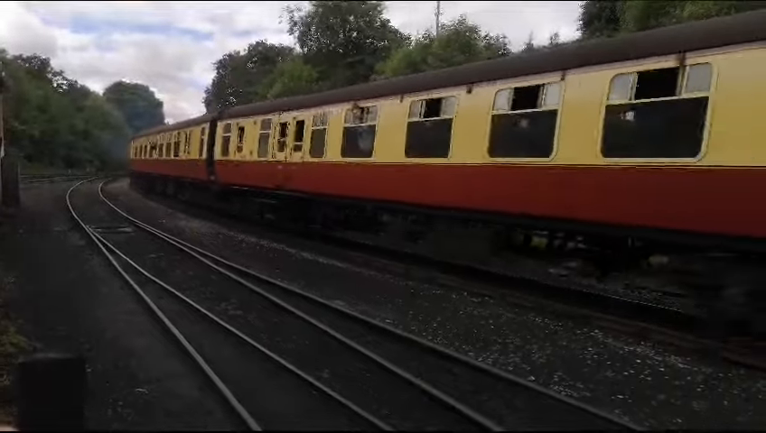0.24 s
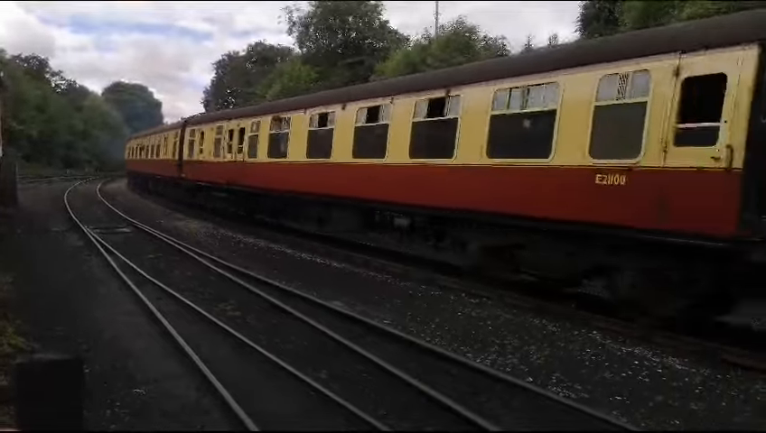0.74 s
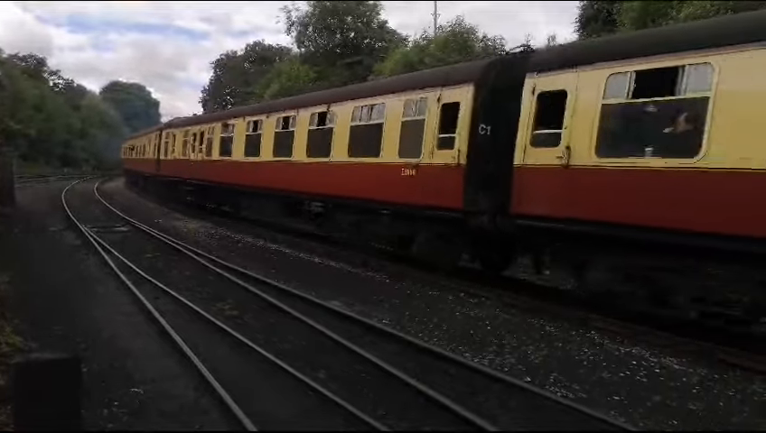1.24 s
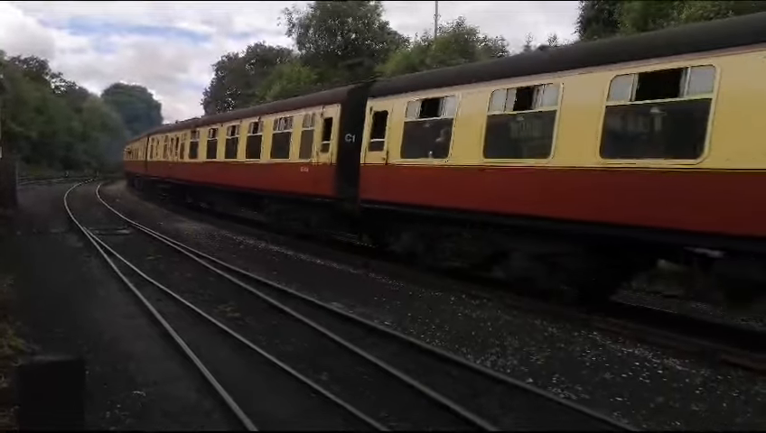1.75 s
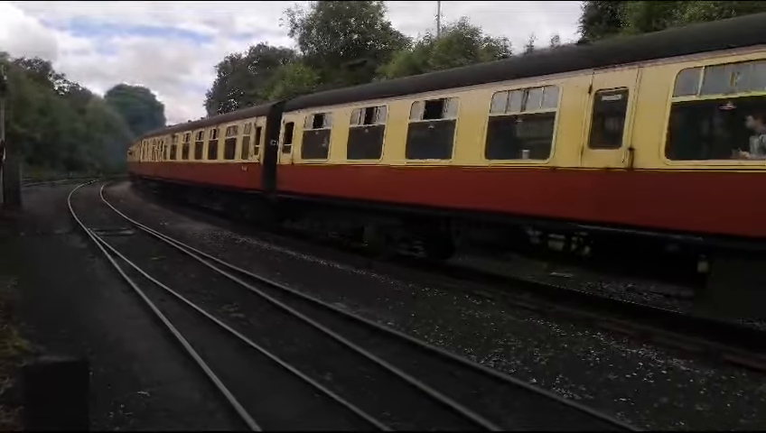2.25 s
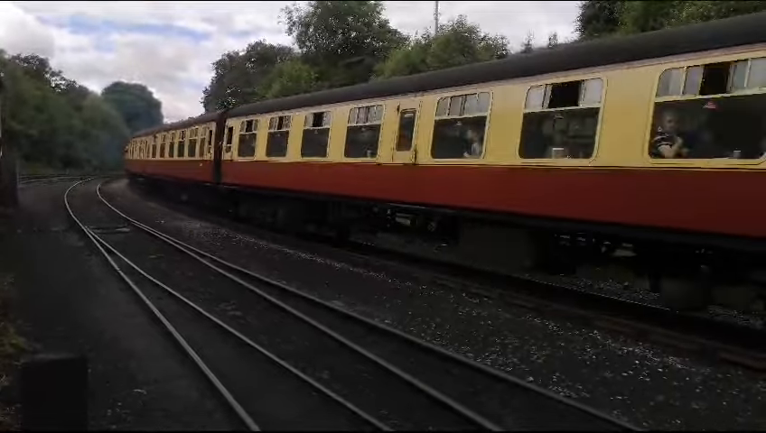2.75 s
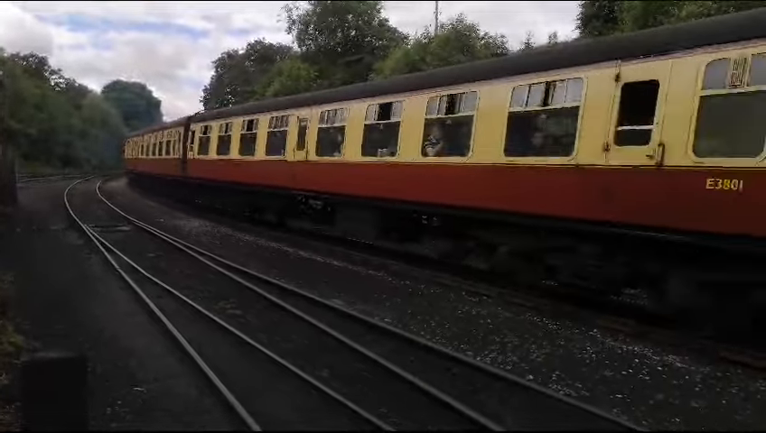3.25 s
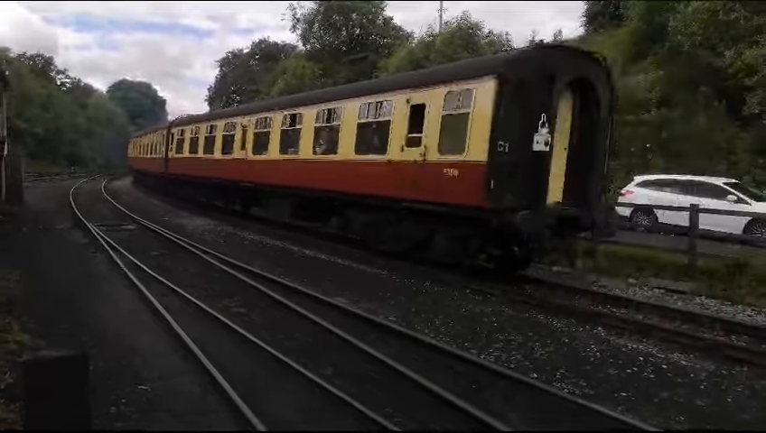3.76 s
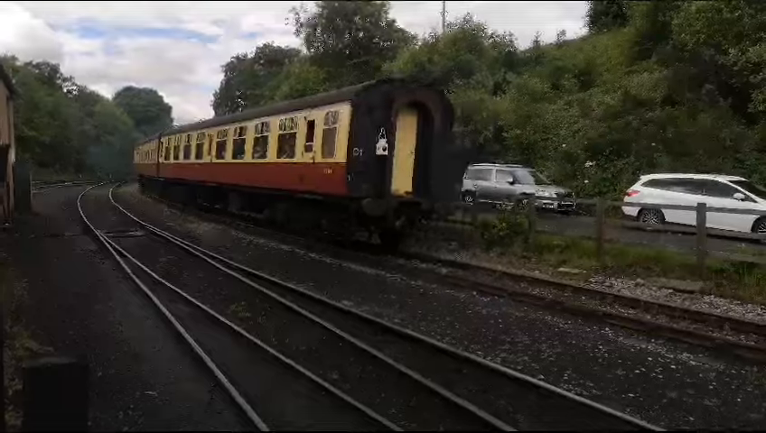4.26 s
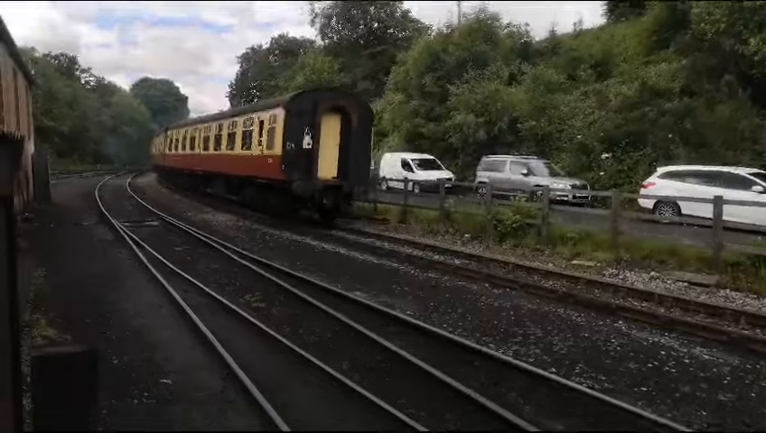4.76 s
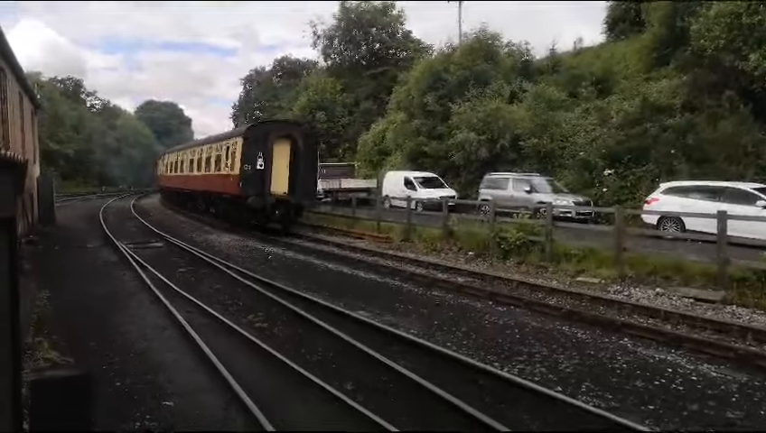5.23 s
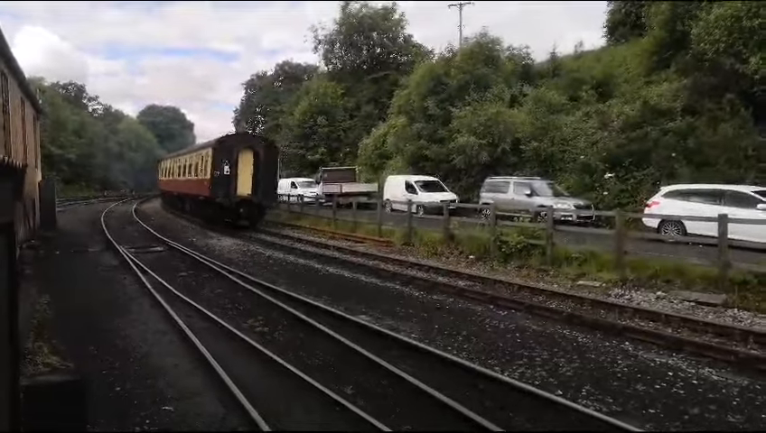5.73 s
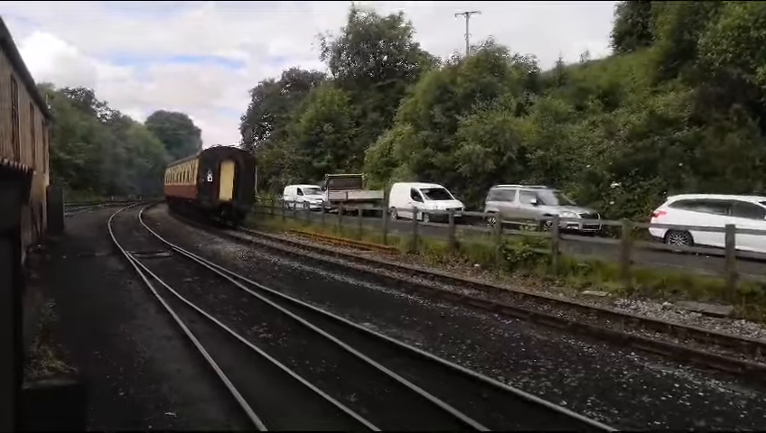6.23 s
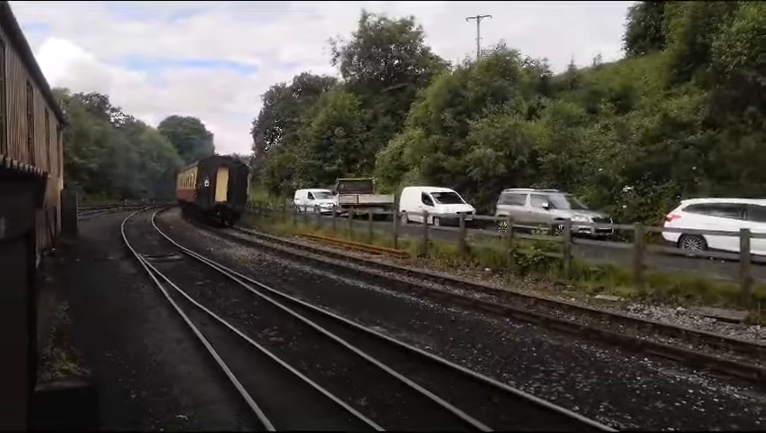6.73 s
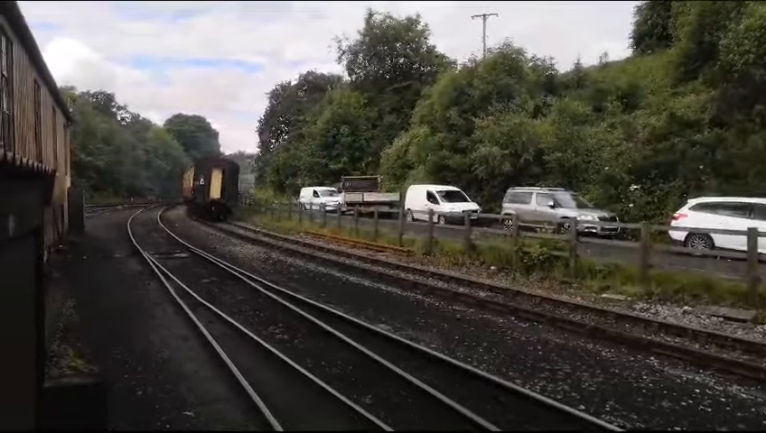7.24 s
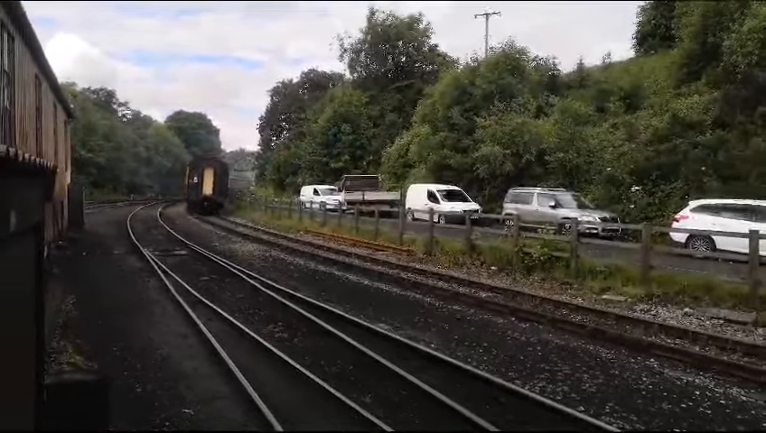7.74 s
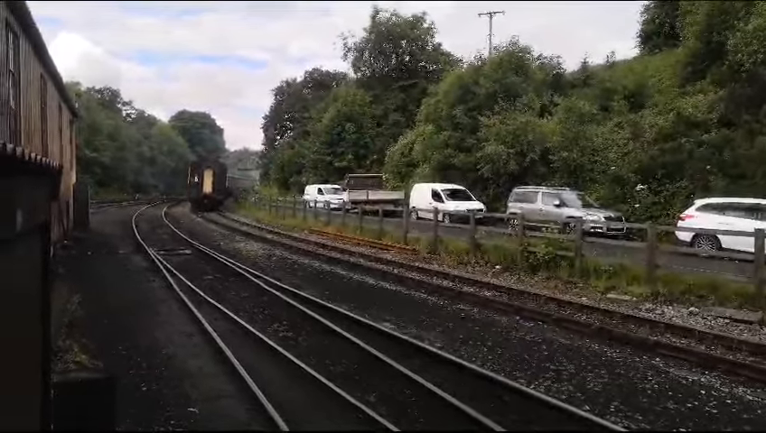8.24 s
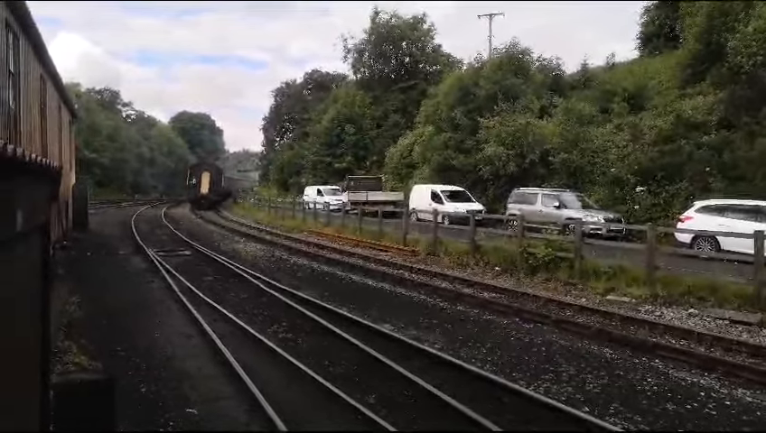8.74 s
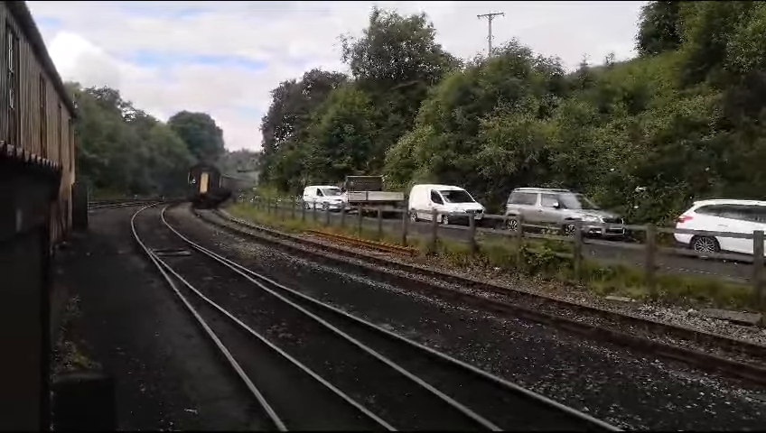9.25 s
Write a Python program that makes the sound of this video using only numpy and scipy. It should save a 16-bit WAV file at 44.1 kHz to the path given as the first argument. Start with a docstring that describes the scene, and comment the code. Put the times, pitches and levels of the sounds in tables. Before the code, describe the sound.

Close by, railway coaches roll past with a deep rumble, rough roar and singing wheels, knocking in clanking clusters over rail joints. After the last coach passes, the rolling fades around a bend. A nearby diesel keeps a low throbbing drone, with fine rattling and small ringing knocks emerging. Outdoor stereo, brighter and fuller on the left, dull on the right.

```python
"""Coaches receding over jointed rails, with a diesel engine

Wheels roar, sing and knock at the rail joints, then the rolling sound falls by an inverse-distance law.
A diesel nearby is made of summed tones, throbbing clatter, a soft murmur, ringing knocks and fine rattling.
Ground rumble lies beneath; ticks and puffs of hiss are heard at the microphone.
The right port is shadowed: filtered duller, with a phase lag on its direct part and a wandering scattered part.
"""
import sys
import numpy as np
from scipy import signal
from scipy.fft import rfft, irfft, next_fast_len
from scipy.io import wavfile

SR = 44100
rng = np.random.default_rng(int(sys.argv[2]) if len(sys.argv) > 2 else 0)


def waveform_to_disk(signal):
    """Save audio, clipped to [-1, 1], as 16-bit WAV at the path in sys.argv[1]."""
    frames = np.transpose(np.atleast_2d(signal))
    scaled = np.clip(frames, -1, 1) * 32767
    samples = np.round(scaled).astype(np.int16)
    wavfile.write(sys.argv[1], SR, samples)


N = 418509
PADDED = next_fast_len(N)
TIME = np.arange(N) / SR  # s
AGE = np.arange(SR // 4) / SR  # s since the onset of a short sound

# Ground rumble spectrum. Each row: frequency in Hz, relative density in dB per Hz.
GROUND_SPECTRUM = [(6, -10), (15, -9.5), (30, -7), (50, -3.5), (75, -8), (100, -12), (160, -24.5)]
# Ground rumble level. Each row: time in seconds, level in dB before its slow surges.
GROUND_LEVEL = [(0, -24.5), (.8, -28), (2.2, -33.5), (3.2, -32.5), (4.6, -31.5), (5.5, -31), (7, -29),
                (8, -31.5), (9.49, -33)]
# Soft murmur of the engine, swelling toward the end. Each row: time in seconds, level in dB.
MURMUR_LEVEL = [(5, -67), (6.5, -60), (7.6, -60), (8.3, -56), (9.49, -44)]
# Louder ringing knocks of the engine. Each row: start in seconds, level in dB before the envelope, pitch in Hz.
ENGINE_KNOCKS = [(7.1608, -21, 1760), (7.3, -20, 1910), (7.4467, -18, 1860), (7.662, -19, 2650),
                 (7.7939, -25, 1920), (7.862, -17, 1830), (7.9076, -18.5, 1810), (8.1719, -19, 1620),
                 (8.6138, -21, 1830)]
# Fine rattling, in spurts from about 5 s on. Each row: time in seconds, level in dB.
RATTLE_LEVEL = [(4.8, -60), (5.05, -47), (5.4, -56), (6.1, -52), (6.3, -43), (6.48, -48), (6.65, -38),
                (6.85, -49), (7.1, -46), (7.8, -36), (8.4, -41), (8.8, -45), (9.49, -47.5)]
# Ticks of the casing. Each row: start in seconds, then the level in dB of each ring in TICK_RINGS.
TICKS = [(4.5092, -13, -26, -31, -36), (4.602, -20, -15, -15, -24), (5.305, -50, -45, -35, -35)]
# Damped rings within a tick. Each row: frequency in Hz, width in Hz.
TICK_RINGS = [(1900, 600), (3000, 900), (5500, 1500), (9500, 4000)]
# Puffs of hiss. Each row: centre in seconds, level in dB, 1/e half-length in seconds.
PUFFS = [(8.33, -50, 0.03), (9.41, -47.5, 0.035)]
# Puff spectrum. Each row: frequency in Hz, relative density in dB per Hz.
PUFF_SPECTRUM = [(2500, -3), (4500, 3), (8000, 0), (9800, -20), (15000, -20)]
# Engine cycle rate. Each row: time in seconds, rate in Hz before a slight wavering.
CYCLE_RATE = [(0, 21.28), (6.9, 21.33), (7.7, 20.56), (9.49, 20.82)]
# Engine tones, of the exhaust and a geared auxiliary. Each row: multiple of the cycle rate, relative level in dB.
ENGINE_TONES = [(1, -5.5), (2, 3), (3, 0.5), (4, -6), (5, -28.5), (6, -0.5), (6.3, -7.5), (7, -9),
                (7.5, -9), (9.2, -19), (13.3, -20), (19, -22.5), (20.3, -19)]
# Engine clatter spectrum. Each row: frequency in Hz, relative density in dB per Hz.
CLATTER_SPECTRUM = [(250, -4), (500, 4.5), (800, -7.5), (1200, -13), (1800, -5), (2650, -4), (3300, -17),
                    (4200, -19), (5000, -41), (5800, -27.5), (6500, -30), (7400, -26), (8200, -32.5),
                    (8900, -23), (9900, -39.5)]
# Engine clatter level. Each row: time in seconds, level in dB.
CLATTER_LEVEL = [(0, -30), (2.8, -30), (3.8, -30.5), (4.6, -33.5), (5.7, -34.5), (6.3, -37), (7.2, -36),
                 (8.2, -37), (9.49, -38.5)]
# Rolling rumble spectrum. Each row: frequency in Hz, relative density in dB per Hz.
RUMBLE_SPECTRUM = [(60, -14.5), (110, -3.5), (140, -2.5), (190, -0.5), (270, -3.5), (310, -7), (350, -11),
                   (450, -20), (600, -25.5)]
# Track roar spectrum. Each row: frequency in Hz, relative density in dB per Hz.
ROAR_SPECTRUM = [(300, -4), (500, 3.5), (800, 2), (1100, -1), (1700, 0), (2600, -4.5), (3300, -43.5),
                 (4500, -18.5), (6000, -26.5), (9000, -24.5)]
# Coach body boom. Each row: time in seconds, pitch in Hz, level in dB before distance loss.
BOOM = [(0, 160, -33), (.7, 175, -31.5), (1.1, 190.3, -30.5), (1.9, 187, -27.5), (2.3, 205, -30.5),
        (2.6, 240, -32.5), (2.97, 264.5, -27.5), (3.25, 215, -52), (3.55, 190, -26), (4.1, 198.4, -24.5),
        (4.45, 190, -28.5), (4.75, 170, -19.5), (5.0, 200, -26), (5.6, 190, -28), (6.3, 190, -35),
        (9.49, 165, -27)]
# Whine of the nearest wheel. Each row: time in seconds, pitch in Hz, level in dB before distance loss.
WHINE = [(0, 1804, -38), (.55, 1830, -38.5), (1.0, 1796, -40), (1.3, 1718, -40), (1.6, 1760, -39),
         (1.9, 1867, -41), (2.6, 1836, -38), (3.1, 1798, -39.5), (3.45, 1740, -37), (3.8, 1775, -39),
         (4.6, 1800, -38), (5.2, 1790, -49), (9.49, 1750, -56)]
# Wheel and rail modes. Each row: frequency in Hz, width in Hz of the first resonance, relative level in dB.
WHEEL_MODES = [(557, 165, -3.5), (951, 19, -6), (1335, 45, 0), (1260, 90, -9.5), (1705, 60, -2.5),
               (1788, 44, -3), (1860, 38, 0.5), (2028, 76, -0.5), (2537, 52, -2.5), (3145, 90, -20.5),
               (3880, 90, -19.5), (5830, 120, -28.5)]
# Strength of singing. Each row: time in seconds, relative drive of low, middle and high modes in dB.
SINGING = [(0, 1, -2.5, -8), (.6, 3.5, 4, 0.5), (1.3, -1.5, 1.5, 0.5), (2.0, -2.5, 3, -2),
           (2.4, -6.5, 3, 5.5), (2.9, 0, 0, -5.5), (3.5, 4.5, 5.5, -8.5), (3.7, 7, 0, 7), (3.9, 4.5, -1, 6),
           (4.3, -3.5, 5, 4), (4.8, -20, -1.5, -6.5), (5.5, -12, -6, 2), (9.49, 7.5, 9.5, -3.5)]
# The two frequencies in Hz that part the low, middle and high modes.
SINGING_SPLIT = [1500, 1950]
# Blows on rail joints. Each row: start in seconds, drive in dB, clear ring pitch in Hz,
# clear ring level in dB, thump level in dB, length scale in seconds.
BLOWS = [(0.282, -25, 1797, -28, -22.5, 0.042), (0.712, -15.5, 1730, -29, -14, 0.01),
         (0.73, -21, 1317, -35, -18, 0.023), (1.063, -18.5, 1680, -23, -15.5, 0.013),
         (1.07, -24.5, 1320, -28, -14, 0.032), (1.1537, -40, 1810, -36, -10.5, 0.015),
         (1.4944, -19.5, 1790, -21, -19, 0.022), (1.516, -16.5, 1747, -13.5, -14.5, 0.018),
         (1.545, -23.5, 1267, -24.5, -33, 0.044), (1.825, -25, 1890, -24, -26, 0.014),
         (1.8412, -20, 1870, -21, -15, 0.013), (1.861, -19.5, 1335, -17, -23, 0.017),
         (1.868, -28, 1890, -18, -39, 0.018), (2.774, -26, 1770, -24, -32, 0.036),
         (3.31, -16, 1740, -20, -21, 0.014), (3.323, -19.5, 1730, -18, -17, 0.029),
         (3.372, -28.5, 1720, -23, -24, 0.016), (3.404, -31, 1730, -30, -21, 0.016),
         (3.433, -25, 1676, -23, -30, 0.012), (3.63, -21, 1800, -22, -12, 0.014),
         (3.646, -18.5, 1335, -15.5, -14.5, 0.019), (3.665, -29, 1335, -32, -17, 0.013),
         (3.69, -32, 2060, -26.5, -29, 0.02), (5.019, -31, 2000, -30.5, -32, 0.025),
         (5.558, -31, 1810, -36, -28.5, 0.029), (5.865, -28, 1823, -36, -44, 0.032)]
# Shadow of the right port. Each row: frequency in Hz, left over right in dB.
SHADOW = [(60, -0.5), (110, -0.5), (190, -1.0), (320, 0.5), (570, 5.0), (1000, 10.0), (1760, 15.0),
          (3090, 17.0), (5430, 17.5), (9530, 22.0)]
# Phase lag of the direct path to the right port. Each row: frequency in Hz, lag in radians.
PHASE_LAG = [(0, 0), (100, .3), (200, .82), (430, 2.1), (1720, 7.1), (2930, 10.6), (4390, 16.2),
             (6120, 21.1), (7240, 25.3), (9730, 33.1)]
# Direct path to the right port. Each row: frequency in Hz, amplitude share from 0 to 1.
DIRECT_SHARE = [(60, 1), (120, .995), (300, .96), (600, .94), (1000, .77), (2000, .89), (3000, .73),
                (4500, .48), (9000, .38)]

GROUND_SURGE_DB = 1.74  # spread
MURMUR_LOW_HZ, MURMUR_HIGH_HZ = 360, 620
KNOCK_WIDTH_HZ, KNOCK_ONSET_S = 91, 0.0016  # engine knocks
RATTLE_PER_S = 300  # mean number of fine blows
TICK_TOP_HZ = 13000
TONES_DB = -30.5
LAST_COACH_S, RECEDE_PER_S = 2.58, 0.94  # the last coach is level; then track distances per second
# Level in dB before distance loss, and the multiple of that loss which each layer takes.
RUMBLE_DB, RUMBLE_FOLLOWS = -26.5, 1.14
ROAR_DB, ROAR_FOLLOWS = -30.5, 0.66
SING_DB, SING_FOLLOWS = -31.5, 1
BOOM_FOLLOWS, WHINE_FOLLOWS = 1.13, 1
CLANK_DB, DULL_DB, SPIT_DB, BODY_DB = 9.5, 8, -24.5, 7  # gains added to the drive of each joint blow
BODY_HZ, BODY_WIDTH_HZ = 490, 225
THUMP_HZ = 149.3
RING_ROUGH = .2  # fast flutter beside the steady part of a clear ring
PORT_TOP_HZ, CUTOFF_HZ = 9550, 15700
SELF_NOISE_DB = np.array([[-75.5], [-81]])  # left, right
TINY = 1e-18  # keeps the recursive filters out of very slow arithmetic


def from_db(db):
    """Decibel law: amplitude gain is ten to the power dB/20."""
    return np.exp(np.asarray(db) * (np.log(10) / 20))


def rms_one(x):
    """Power normalisation: the signal is scaled to rms 1."""
    return x / np.sqrt(np.mean(x ** 2) + 1e-20)


def in_time(rows):
    """Linear interpolation of a curve's columns at every sample."""
    s, *columns = np.transpose(rows)
    return [np.interp(TIME, s, column) for column in columns]


def at_hz(points, hz):
    """Spectral interpolation, linear in the logarithm of frequency."""
    known_hz, values = np.transpose(points)
    return np.interp(np.log(hz), np.log(known_hz), values)


def spectrum_hz():
    """Discrete Fourier bins in Hz, kept above zero for logarithms."""
    return np.maximum(np.fft.rfftfreq(PADDED, 1 / SR), 1)


def butter(x, order, hz, kind="low"):
    """Butterworth filtering: a maximally flat pass band."""
    return signal.sosfilt(signal.butter(order, hz, kind, fs=SR, output="sos"), x)


def drift(rate):
    """Random fluctuation: noise through a double low-pass pole at rate Hz, near unit spread."""
    step = 40  # samples between computed points
    r = np.exp(-2 * np.pi * step * rate / SR)
    noise = rng.standard_normal(N // step + 2002)
    slow = signal.lfilter([1], [1, -2 * r, r * r], noise)[2000:]  # drops the filter's start
    return np.interp(np.arange(N) / step, np.arange(len(slow)), rms_one(slow))


def resonance(x, hz, width_hz):
    """Damped oscillator: a two-pole resonance with about unit peak gain."""
    r = np.exp(-np.pi * width_hz / SR)
    poles = [1, -2 * r * np.cos(2 * np.pi * hz / SR), r * r]
    return signal.lfilter([(1 - r * r) / 2, 0, (r * r - 1) / 2], poles, x)


def coloured(spectrum, patchy_db, rate):
    """Spectral shaping: filtered noise whose overlapping bands flicker partly on their own; rms 1."""
    hz = spectrum_hz()
    low, high = spectrum[0][0], spectrum[-1][0]
    skirts = 1 / (1 + (low / hz) ** 4) / (1 + (hz / high) ** 8)
    noise = rfft(rng.standard_normal(PADDED)) * from_db(at_hz(spectrum, hz)) * skirts
    last = int(1.2 * np.log2(high / low))  # 1.2 bands per octave
    place = np.clip(1.2 * np.log2(hz / low), 0, last)
    together, out = drift(rate / 4), 0
    for k in range(last + 1):
        band = irfft(noise * np.clip(1 - abs(place - k), 0, 1), PADDED)[:N]
        out = out + band * from_db(patchy_db * (.3 * together + drift(rate)))
    return rms_one(out)


def gliding(hz, rate):
    """Quadrature modulation: a narrow noise band around a moving pitch; rms 1."""
    turn = 2 * np.pi * np.cumsum(hz) / SR
    return rms_one(drift(rate) * np.cos(turn) + drift(rate) * np.sin(turn))


def swell(length):
    """Critically damped pulse: a quick rise and slower fall, top 1."""
    return np.e * 2 * AGE / length * np.exp(-2 * AGE / length)


def burst(length):
    """Impact envelope: a quick exponential start and a Gaussian end, top near 1."""
    return (1 - np.exp(-11 * AGE / length)) * np.exp(-np.minimum(.8 * AGE / length, 5) ** 2)


def add(track, s, sound):
    """Superposition: a short sound is summed into a track at s seconds."""
    part = track[round(s * SR):][:len(sound)]
    part += sound[:len(part)]


def ground():
    """Low-frequency noise: a patchy rumble with slow surges of level."""
    level_db = in_time(GROUND_LEVEL)[0] + GROUND_SURGE_DB * drift(1.0)
    return from_db(level_db) * coloured(GROUND_SPECTRUM, patchy_db=3.5, rate=3.1)


def murmur():
    """Band-limited noise: a soft, patchy low-middle murmur of the engine, swelling toward the end."""
    spectrum = [(MURMUR_LOW_HZ, 0), (MURMUR_HIGH_HZ, -2)]
    return from_db(in_time(MURMUR_LEVEL)[0]) * coloured(spectrum, patchy_db=4.0, rate=5.6)


def ticks():
    """Heavily damped modes: very short rings of the casing, neighbours in opposite sign."""
    out, age = np.zeros(N), AGE[:400]
    for s, *rings_db in TICKS:
        for k, (db, (hz, width)) in enumerate(zip(rings_db, TICK_RINGS)):
            ring = np.exp(-np.pi * width * age) * np.sin(2 * np.pi * hz * age)
            add(out, s, (-1) ** k * from_db(db) * ring)
    return butter(out + TINY, 8, TICK_TOP_HZ)


def puffs():
    """Gated noise: brief soft puffs of hiss close to the microphone, under Gaussian envelopes."""
    envelope = np.zeros(N)
    for s, db, length in PUFFS:
        envelope += from_db(db) * np.exp(-((TIME - s) / length) ** 2)
    return coloured(PUFF_SPECTRUM, patchy_db=2.0, rate=30.0) * envelope


def engine_knocks():
    """Free decay: the louder ringing knocks of the engine are damped sines."""
    out, age = np.zeros(N), AGE[:2000]
    decay = np.exp(-np.pi * KNOCK_WIDTH_HZ * age) * (1 - np.exp(-age / KNOCK_ONSET_S))
    for s, db, hz in ENGINE_KNOCKS:
        add(out, s, from_db(db) * decay * np.sin(2 * np.pi * hz * age))
    return out


def fine_rattle():
    """Random impulsive excitation: fine blows at chance moments drive eight resonances."""
    happens = rng.random(N) < RATTLE_PER_S / SR
    strength = from_db(3 * np.minimum(rng.exponential(1, N), 3))
    struck = happens * strength * np.sign(rng.random(N) - .5)
    dealt, fine = rng.integers(0, 8, N), 0  # each blow falls to one pitch
    for k, hz in enumerate(np.geomspace(1300, 2750, 8)):
        fine = fine + resonance(resonance(struck * (dealt == k) + TINY, hz, 87), hz, 300)
    return from_db(in_time(RATTLE_LEVEL)[0]) * rms_one(fine)


def engine():
    """Periodic excitation: wavering engine tones, and clatter with a strong and a weak beat per cycle."""
    cycle_hz, = in_time(CYCLE_RATE)
    phase = 2 * np.pi * np.cumsum(cycle_hz * (1 + 0.0017 * drift(1.0))) / SR
    tones = 0
    for k, db in ENGINE_TONES:
        tones = tones + from_db(db + 2.83 * drift(2.4)) * np.sin(k * phase + rng.uniform(0, 2 * np.pi))
    beat_db = 2.8 * np.cos(2 * phase) + 1.9 * np.cos(4 * phase + 1.2) + 1.2 * np.cos(phase + .7)
    clatter = coloured(CLATTER_SPECTRUM, patchy_db=1.0, rate=7.7)
    bright = signal.sosfiltfilt(signal.butter(3, 6500, "high", fs=SR, output="sos"), clatter)
    # the top beats most clearly
    throbbing = (clatter - bright) * from_db(0.46 * beat_db) + bright * from_db(beat_db)
    clatter_gain = from_db(in_time(CLATTER_LEVEL)[0])
    return from_db(TONES_DB) * rms_one(tones) + clatter_gain * rms_one(throbbing)


def fading():
    """Inverse-distance law: level change in dB as the last coach recedes."""
    gone = RECEDE_PER_S * np.maximum(TIME - LAST_COACH_S, 0)  # in track distances
    return -10 * np.log10(1 + gone ** 2)


def wheel_ring(force, couplings):
    """Modal superposition: one force drives every wheel mode through a coupling of its own."""
    out = 0
    for k, (hz, width, db) in enumerate(WHEEL_MODES):
        first = resonance(force * couplings[k] + TINY, hz, width)
        out = out + from_db(db) * (-1) ** k * resonance(first, hz, 2.2 * width)
    return out


def singing():
    """Forced vibration: steady noise drives the wheel modes with varying strength; rms 1."""
    groups_db = in_time(SINGING)
    couplings = []
    for hz, _, _ in WHEEL_MODES:
        group = np.searchsorted(SINGING_SPLIT, hz)
        couplings.append(from_db(groups_db[group] + 2 * drift(5)))
    return rms_one(wheel_ring(rng.standard_normal(N), couplings))


def rolling():
    """Roughness excitation: rails shake coach bodies (rumble, boom), track (roar) and wheels (song, whine)."""
    boom_hz, boom_db = in_time(BOOM)
    whine_hz, whine_db = in_time(WHINE)
    layers = [
        (RUMBLE_DB, RUMBLE_FOLLOWS, coloured(RUMBLE_SPECTRUM, patchy_db=0.5, rate=5.5)),
        (boom_db, BOOM_FOLLOWS, gliding(boom_hz, 20)),
        (ROAR_DB, ROAR_FOLLOWS, coloured(ROAR_SPECTRUM, patchy_db=1.2, rate=21.0)),
        (SING_DB, SING_FOLLOWS, singing()),
        (whine_db, WHINE_FOLLOWS, gliding(whine_hz, 25))]
    loss_db = fading()
    return sum(from_db(db + follows * loss_db) * sound for db, follows, sound in layers)


def joints():
    """Impact excitation: each blow rattles wheel modes and a hollow body, with knock, treble and bogie thump."""
    rattle = rng.standard_normal(N) * from_db(1.46 * drift(120))
    couplings = np.zeros((len(WHEEL_MODES), N))
    blows, thump, rings = np.zeros((3, N))
    for s, db, ring_hz, ring_db, thump_db, length in BLOWS:
        envelope = burst(length)
        add(blows, s, from_db(db) * envelope)
        add(thump, s, from_db(thump_db) * swell(0.98 * length) * np.sin(2 * np.pi * THUMP_HZ * AGE))
        add(rings, s, from_db(ring_db) * envelope * np.sin(2 * np.pi * ring_hz * AGE))
        for coupling, (hz, _, _) in zip(couplings, WHEEL_MODES):
            # modes near the clear ring's pitch are driven up to 3 dB harder
            favour_db = 3 * np.exp(-(np.log(hz / ring_hz) / .05) ** 2)
            add(coupling, s, from_db(db + favour_db) * envelope)
    force = blows * rattle + TINY
    clank = wheel_ring(rattle, couplings)
    dull_knock = butter(butter(force, 1, [700, 2000], "band"), 4, 2400)
    spit = butter(force, 2, [4500, 8000], "band")  # faint treble
    body = resonance(resonance(force, BODY_HZ, BODY_WIDTH_HZ), BODY_HZ, 2 * BODY_WIDTH_HZ)
    clear = rings * (1 + RING_ROUGH * drift(70)) / np.hypot(1, RING_ROUGH)
    struck = from_db(CLANK_DB) * clank + from_db(DULL_DB) * dull_knock
    return struck + from_db(SPIT_DB) * spit + from_db(BODY_DB) * body + thump + clear


def shadowed_port(left):
    """Diffraction and scattering: a dulled, phase-lagged direct part plus a part of wandering phase."""
    hz = spectrum_hz()
    dull = rfft(left, PADDED) * from_db(-at_hz(SHADOW, hz))
    share = np.clip(at_hz(DIRECT_SHARE, hz), 0, 1)
    lag = np.interp(hz, *np.transpose(PHASE_LAG))
    direct = irfft(dull * share * np.exp(-1j * lag), PADDED)[:N]
    indirect = irfft(dull * np.sqrt(1 - share ** 2), PADDED)  # the rest of the power
    scattered = signal.hilbert(indirect)[:N] * np.exp(3j * drift(4))
    return direct + scattered.real


def scene():
    """Superposition at two ports: airborne sound is low-passed; ticks and puffs come through the casing."""
    airborne = ground() + murmur() + engine_knocks() + fine_rattle() + engine() + rolling() + joints()
    left = butter(airborne, 20, PORT_TOP_HZ) + ticks() + puffs()
    return np.array([left, shadowed_port(left)])


def record(dry):
    """Additive white self-noise, stronger at the left, and a steep low-pass at the top."""
    noisy = dry + from_db(SELF_NOISE_DB) * rng.standard_normal(dry.shape)
    return signal.sosfilt(signal.cheby2(20, 40, CUTOFF_HZ, fs=SR, output="sos"), noisy)


dry = scene()
out = record(dry)
waveform_to_disk(out)
```